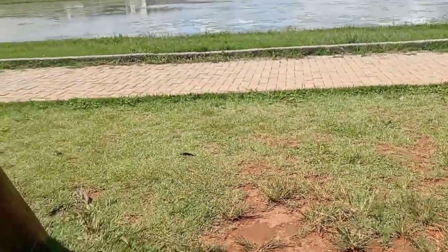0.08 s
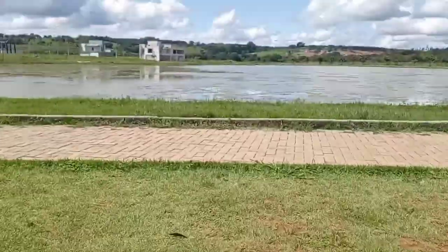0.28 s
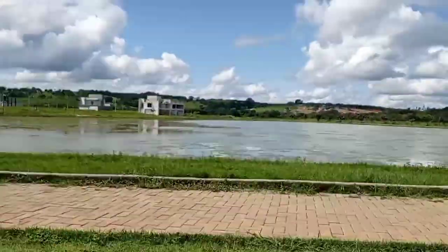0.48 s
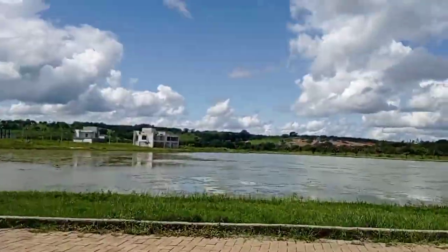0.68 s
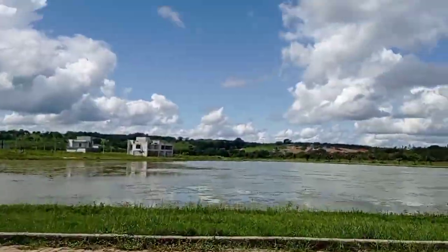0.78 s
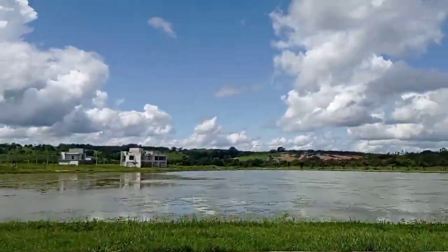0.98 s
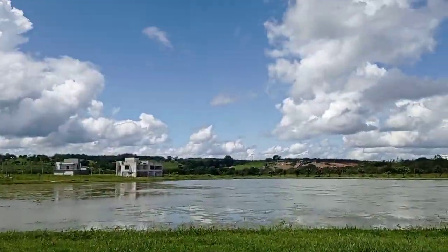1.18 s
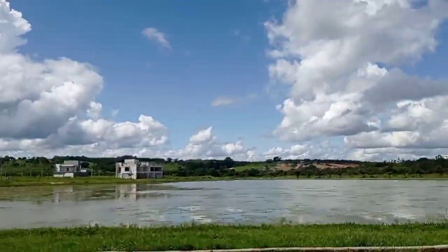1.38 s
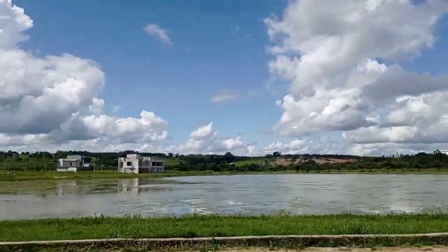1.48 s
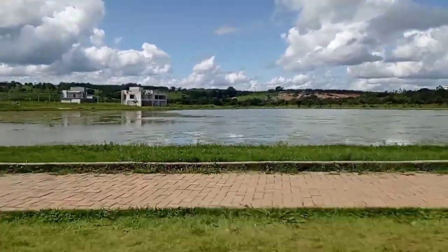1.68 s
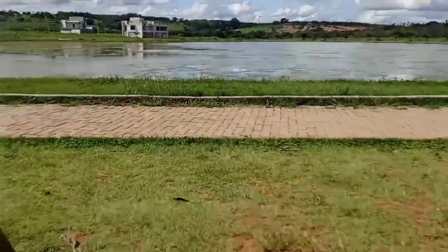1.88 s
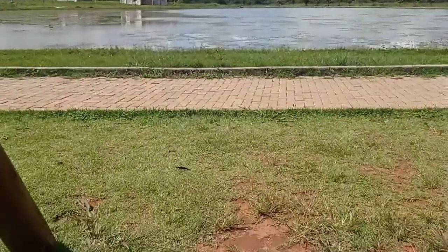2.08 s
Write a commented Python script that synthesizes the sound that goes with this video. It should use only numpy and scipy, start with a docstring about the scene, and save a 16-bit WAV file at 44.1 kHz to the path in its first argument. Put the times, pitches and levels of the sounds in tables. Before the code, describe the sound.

A rusty playground swing squeaks close by in an open park: a long squeal with a rough rattling start, a quiet gap, then a stuttering double shriek sinking to a low moan and faint clicks, over soft wind.

```python
"""An open park with a playground swing, heard from its seat: the dry steel hanger sticks and slips on two strokes.
Going out it sings one long squeal, with a rough groan and rattle at the start. Coming back it stutters, shrieks on
two pitches at once, sinks to a low moan and stops with faint clicks. The squeals are trembling sine waves with
overtones, the rattle and clicks are ringing steel, and the rubbing and ticks are shaped noise.
Soft wind, dull bumps of the seat and a far bird lie behind."""
import sys
import numpy as np
from scipy import signal
from scipy.fft import rfft, irfft, next_fast_len
from scipy.io import wavfile
from scipy.ndimage import map_coordinates

SR = 44100
rng = np.random.default_rng(int(sys.argv[2]) if len(sys.argv) > 2 else 0)


def log_audio(samples):
    """Write samples as a 16-bit WAV file to the path given in sys.argv[1]."""
    # one column per channel
    frames = np.atleast_2d(samples).T
    # limit to full scale, then quantise
    limited = np.clip(frames, -1, 1)
    pcm = np.round(limited * 32767).astype(np.int16)
    wavfile.write(sys.argv[1], SR, pcm)


N = 94815
T = np.arange(N) / SR  # time of every sample, in seconds

# Tone colour of steel rubbing on steel, relative: pitch_hz, level_db (per Hz)
RUBBING_COLOUR = [(300, -13.5), (600, -18.5), (1000, 5.5), (1450, -7), (2000, -6), (2900, -8.5),
                  (3400, -15), (4800, -14), (6100, -10), (7000, -20), (8000, -31)]


def amp(db):
    """Turn decibels into gain."""
    return 10 ** (np.asarray(db) / 20)


def unit(x):
    """Scale a sound to an rms of 1."""
    return x / np.sqrt(np.mean(x ** 2) + 1e-20)


def curve(rows, axis=1):
    """Join one column of a table by straight lines in time."""
    rows = np.array(rows)
    return np.interp(T, rows[:, 0], rows[:, axis])


def gate(start, end, edge_s):
    """Open between two times, with soft edges."""
    opening = 1 + np.tanh((T - start) / edge_s)
    closing = 1 + np.tanh((end - T) / edge_s)
    return opening * closing / 4


def envelope(rows, axis=1):
    """Turn a column of decibels into gain that fades to silence outside its rows."""
    return amp(curve(rows, axis)) * gate(rows[0][0], rows[-1][0], edge_s=0.0011)


def wobble(rate):
    """Draw a smooth random curve through a given number of random points a second."""
    points = rng.standard_normal(8192)
    return map_coordinates(points, [T * rate], mode="wrap")


def filtered(x, response):
    """Multiply the spectrum of x by a gain that depends on frequency."""
    size = next_fast_len(N + 8192)
    gain = response(np.fft.rfftfreq(size, 1 / SR))
    return irfft(rfft(x, size) * gain, size)[:N]


def noise(colour):
    """Make noise of rms 1 whose spectrum follows a table of pitch_hz, level_db."""
    colour_hz, colour_db = np.transpose(colour)

    def response(hz):
        return amp(np.interp(np.log(hz + 1), np.log(colour_hz), colour_db))

    return unit(filtered(rng.standard_normal(N), response))


def slip_phase(hz, jitter, rate):
    """Follow the phase of a stick-slip oscillation whose pitch trembles by the fraction jitter."""
    trembling_hz = hz * (1 + jitter * wobble(rate))
    return 2 * np.pi * np.cumsum(trembling_hz) / SR


def partials(phase, table, flutter_db, rate):
    """Add up multiples of one oscillation, each fluttering in level."""
    total = np.zeros(N)
    for multiple, db in table:
        level = amp(db + flutter_db * wobble(rate))
        total += level * np.sin(multiple * phase + rng.uniform(0, 2 * np.pi))
    return total


def glides(table, jitter, flutter_db, edge_s):
    """Play short tones that glide from a first pitch to a last pitch."""
    total = np.zeros(N)
    for start, length, first_hz, last_hz, db in table:
        end = start + length
        level = amp(db + flutter_db * wobble(160)) * gate(start, end, edge_s)
        hz = np.interp(T, [start, end], [first_hz, last_hz])
        total += level * np.sin(slip_phase(hz, jitter, rate=400))
    return total


def outward_squeal():
    """Stick-slip gives a long clean note that falters now and then; it trembles more while the load is high."""
    # Pitch of the squeal: time_s, pitch_hz
    pitch = [(.2, 1240), (.235, 1250), (.34, 1252), (.375, 1230), (.43, 1228), (.49, 1235), (.54, 1243),
             (.6, 1245), (.65, 1246), (.73, 1255), (.81, 1245), (.88, 1256), (.95, 1250)]
    # Loudness of its lowest tone before the falters: time_s, level_db
    tone_level = [(.203, -45), (.212, -23), (.228, -20.5), (.255, -20), (.275, -28), (.31, -18.5),
                  (.331, -36.5), (.35, -20.5), (.372, -15), (.405, -23.5), (.44, -25.5), (.52, -23.5),
                  (.56, -28), (.59, -22.5), (.695, -33.5), (.765, -31), (.785, -37), (.815, -36.5),
                  (.885, -39.5), (.94, -38.5), (.952, -80)]
    # Loudness of its overtones before the falters: time_s, level_db
    edge_level = [(.205, -63), (.222, -49.5), (.345, -53.5), (.38, -41), (.47, -38.5), (.52, -38.5),
                  (.59, -40), (.68, -43), (.75, -41), (.81, -54), (.835, -59), (.885, -50), (.915, -81),
                  (.95, -56)]
    # Overtones of the squeal, relative: multiple, level_db
    overtones = [(2, 1.5), (3, -8.5), (4, -5.5), (5, 3.5), (6, -14)]
    # Brief dips in level: time_s, width_s (to either side), depth_db
    falters = [(.427, 0.0046, 10), (0.455, 0.0047, 11), (0.478, 0.0033, 11), (.498, 0.0037, 16.5),
               (0.529, 0.0054, 8), (.832, 0.0065, 25), (0.867, 0.0045, 20), (.921, .008, 32)]

    strain = np.interp(T, [.5, .56], [1, 0])  # high load, then none
    phase = slip_phase(curve(pitch), .0014 + 0.0021 * strain, rate=220)
    dip_db = sum(depth * np.exp(-((T - time) / width) ** 2) for time, width, depth in falters)
    edge = partials(phase, overtones, flutter_db=2.5 + 1.5 * strain, rate=57)
    return amp(-dip_db) * (envelope(tone_level) * np.sin(phase) + envelope(edge_level) * edge)


def groan():
    """A second, rougher stick-slip note breaks in under the squeal."""
    # Course of the groan: time_s, pitch_hz, level_db
    course = [(.2388, 815, -18), (.241, 835, -13), (.247, 855, -14), (.251, 876, -20), (.26, 877, -18),
              (.29, 877, -18), (.315, 877, -20), (.348, 880, -23), (.362, 890, -45)]
    # Tones that make up the groan, relative: multiple, level_db
    tones = [(1, 2.5), (2, -15.5), (3, -22), (4, -39), (2.43, -19.5)]

    phase = slip_phase(curve(course), jitter=0.0097, rate=370)
    return envelope(course, axis=2) * partials(phase, tones, flutter_db=2.3, rate=220)


def stutter():
    """The hanger catches: each note swells, sags in pitch and is choked; overtones and grit come with strength."""
    # Notes: peak_s, pitch_hz (at the peak), level_db, swell_s, choke_s
    notes = [(1.422, 1010, -21.5, 0.0033, 0.0084), (1.4755, 1085, -7.5, 0.0039, 0.0053),
             (1.506, 1095, -12.5, 0.011, .004), (1.525, 1065, -13, .003, 0.0036),
             (1.554, 1090, -13.5, 0.011, 0.0021), (1.579, 1075, -16.5, 0.0076, .004)]
    # Overtones of each note, relative: multiple, level_db
    overtones = [(2, -20), (3, -34), (4, -37), (5, -28.5), (6, -29.5), (7, -46)]
    # Tone colour of the grit, relative: pitch_hz, level_db (per Hz)
    grit_colour = [(500, -19), (1500, -20), (2200, -0.5), (2800, -15), (4800, -15.5), (5600, -1),
                   (6500, 12), (7100, -21), (8000, -21.5)]
    sag_hz, sag_s = 45, 0.011  # the pitch starts this far above its middle and ends as far below
    grit_db = -24

    out = np.zeros(N)
    grit = amp(grit_db) * noise(grit_colour)
    for peak, hz, db, swell_s, choke_s in notes:
        since_peak = T - peak
        rise = np.exp(1 - np.hypot(1, 1.66 * since_peak / swell_s))
        fall = np.exp(-(since_peak / choke_s) ** 2)
        swell = np.where(T < peak, rise, fall)
        sagging_hz = hz - sag_hz * np.tanh(since_peak / sag_s)
        phase = slip_phase(sagging_hz, jitter=.014, rate=710)
        edge = partials(phase, overtones, flutter_db=4.5, rate=400) + grit
        out += amp(db) * swell * (np.sin(phase) + swell ** .5 * edge)
    return out


def shriek():
    """On the way back the stick-slip squeal climbs near its old pitch while a rough lower voice sounds with it."""
    # Return squeal: time_s, pitch_hz, lowest_tone_db, overtones_db
    squeal = [(1.43, 1118, -46, -68), (1.455, 1144, -30.5, -51), (1.49, 1140, -29, -36),
              (1.545, 1150, -39.5, -49.5), (1.57, 1185, -25.5, -27.5), (1.595, 1209, -28, -36.5),
              (1.632, 1223, -20.5, -24.5), (1.655, 1213, -24.5, -25.5), (1.682, 1247, -53, -27),
              (1.705, 1239, -44.5, -36), (1.74, 1240, -49.5, -60)]
    # Overtones of the return squeal, relative: multiple, level_db
    overtones = [(2, 1), (3, -20.5), (4, -29.5), (5, -19)]
    # Lower voice: time_s, pitch_hz, level_db (relative)
    lower_voice = [(1.555, 1000, -31.5), (1.572, 970.5, -31), (1.59, 958.3, -26.5), (1.602, 943, -43),
                   (1.612, 967, -21), (1.636, 938, -29), (1.656, 986, -42), (1.668, 981, -36.5),
                   (1.677, 983, -20.5), (1.692, 938, -24), (1.706, 925, -35), (1.724, 952, -28),
                   (1.742, 920, -47)]
    # Tones that make up the lower voice, relative: multiple, level_db
    lower_tones = [(1, 2), (2, -11), (3, -14.5), (4, -29.5), (5, -21), (6, -25)]

    phase = slip_phase(curve(squeal), jitter=0.0078, rate=300)
    edge = partials(phase, overtones, flutter_db=2.5, rate=150)
    upper = envelope(squeal, axis=2) * np.sin(phase) + envelope(squeal, axis=3) * edge
    lower_phase = slip_phase(curve(lower_voice), jitter=0.01, rate=350)
    lower = partials(lower_phase, lower_tones, flutter_db=1.5, rate=180)
    return upper + amp(-.5) * envelope(lower_voice, axis=2) * lower


def whistles():
    """A high mode of the hanger flares in bursts, gritty or cleaner; a lower voice gives it side tones."""
    # Bursts: start_s, length_s, level_db (relative), roughness (0 to 1)
    bursts = [(1.587, .006, -36.5, .9), (1.61, 0.0062, -25.5, 0.6), (1.627, .011, -31, .9),
              (1.672, 0.0053, -26, 0.8), (1.679, 0.044, -25.5, 0.2), (1.753, 0.024, -49.5, .5)]
    # Side tones, relative: multiple (of the lower voice, added to the whistle), level_db
    side_tones = [(-2, -20.5), (-1, -23), (0, 3.5), (1, -5)]
    whistle_hz, lower_hz = 6193, 938
    scatter, grit_db = .018, -4  # at full roughness: pitch trembling as a fraction, level of the grit

    out = np.zeros(N)
    lower = slip_phase(lower_hz, jitter=.008, rate=380)
    grit = amp(grit_db) * noise(RUBBING_COLOUR)
    for start, length, db, rough in bursts:
        phase = slip_phase(whistle_hz, scatter * rough, rate=800)
        tone = sum(amp(tone_db) * np.sin(phase + k * lower) for k, tone_db in side_tones)
        level = amp(db + 1.2 * wobble(250)) * gate(start, start + length, edge_s=0.0016)
        out += level * (tone + rough * grit)
    return out


def moan():
    """The slowing hanger ends on a low stick-slip note that loses its overtones as it fades."""
    # Course of the moan: time_s, pitch_hz, level_db
    course = [(1.846, 790, -55), (1.856, 738, -38), (1.862, 728, -29), (1.888, 733, -34), (1.903, 750, -33),
              (1.919, 762, -42), (1.932, 738, -37), (1.96, 742, -42), (1.985, 735, -47), (2.003, 705, -60)]
    # Overtones of the moan, relative: multiple, level_db
    overtones = [(2, -3), (3, -10), (4, -20.5), (5, -19.5), (6, -21.5), (7, -25), (8, -24)]
    dulling = 0.2  # how strongly the overtones shrink with the level

    phase = slip_phase(curve(course), jitter=0.0085, rate=230)
    level = envelope(course, axis=2)
    brightness = (level / level.max()) ** dulling
    edge = brightness * partials(phase, overtones, flutter_db=2.0, rate=76)
    return level * (np.sin(phase) + edge)


def side_squeaks():
    """Weak trembling tones glide up, down or level beside the main squeals."""
    # Squeaks: start_s, length_s, first_hz, last_hz, level_db
    squeaks = [(0.307, .05, 510, 514, -41), (0.24, .025, 2200, 2000, -45.5), (.365, 0.14, 2100, 1850, -49),
               (1.73, 0.062, 1590, 1545, -38), (1.744, 0.049, 1057, 1200, -34),
               (1.747, 0.068, 2560, 2640, -46), (1.753, 0.067, 1360, 1360, -36),
               (1.809, 0.041, 1195, 1140, -32)]
    return glides(squeaks, jitter=.015, flutter_db=2.0, edge_s=.005)


def link():
    """Every jolt or click rings the chain link anew as a set of fading sine waves."""
    # Jolts during the groan: time_s, level_db (relative)
    jolts = [(.2395, -11), (.2465, -12.5), (.258, -18), (.273, -15), (.281, -18.5), (.2912, -9),
             (0.3075, -16), (.318, -29.5), (.337, -24), (.35, -37.5)]
    # Later clicks of the link: time_s, level_db (relative)
    clicks = [(1.399, -35.5), (1.409, -26), (2.036, -32), (2.056, -39), (2.063, -40), (2.074, -40)]
    # Tones the link rings with: pitch_hz, level_db (before random variation), t60_s (time to fade by 60 dB)
    modes = [(688, -13, 0.045), (815, -10.5, 0.084), (884, -12, 0.09), (1015, -7.5, 0.036),
             (1155, -3, 0.04), (1784, -9, 0.022), (2138, -21, .08), (2350, -17, 0.077), (2640, -24, 0.045),
             (3010, -26, .05), (5400, -26.5, .02), (5850, -21, 0.028), (6300, -27, .02)]

    out = np.zeros(N + SR)
    t = np.arange(SR // 8) / SR
    attack = 1 - np.exp(-t / .0006)
    for start, db in jolts + clicks:
        ring = np.zeros(len(t))
        for hz, mode_db, t60 in modes:
            fading = amp(mode_db + rng.normal(0, 2) - 60 * t / t60)
            ring += fading * np.sin(2 * np.pi * (hz * t + rng.random()))
        out[round(start * SR):][:len(t)] += amp(db) * ring * attack
    return out[:N]


def ticks():
    """Light dry contacts along the chain: bursts of noise that start at once and die away."""
    # Contacts: time_s, level_db (relative)
    contacts = [(.188, -35), (1.147, -34), (2.037, -41), (2.136, -46)]
    # Tone colour of the contacts, relative: pitch_hz, level_db
    contact_colour = [(500, 2), (1500, -18), (2300, 5), (3200, -8.5), (4500, -23), (6000, -23), (8000, -31)]
    decay_s = 0.0044

    level = sum(amp(db) * (T > time) * np.exp(-abs(T - time) / decay_s) for time, db in contacts)
    return noise(contact_colour) * level


def rubbing():
    """Steel rubbing on steel: gritty friction noise that swells and fades with the strokes."""
    # Loudness of the rubbing: time_s, level_db
    loudness = [(.23, -87), (.242, -30.5), (.31, -32.5), (.35, -32.5), (.42, -41.5), (.55, -62.5),
                (1.38, -63.5), (1.41, -40.5), (1.45, -60.5), (1.56, -56), (1.59, -29.5), (1.635, -38),
                (1.655, -49), (1.677, -36.5), (1.73, -48), (1.77, -44.5), (1.87, -43), (1.95, -52.5),
                (2.02, -60)]
    grit = unit(noise(RUBBING_COLOUR) * amp(2.1 * wobble(350)))
    return envelope(loudness) * grit


def seat_bumps():
    """Dull bumps of the seat: low noise in short, rounded swells."""
    # Bumps: time_s, width_s (to either side), level_db
    bumps = [(1.603, .008, -36), (1.62, .025, -46), (1.846, .018, -43)]
    # Tone colour of the bumps, relative: pitch_hz, level_db (per Hz)
    bump_colour = [(30, -21), (90, -6.5), (150, 0.5), (280, -11), (600, -32), (2000, -55)]
    level = sum(amp(db) * np.exp(-((T - time) / width) ** 2) for time, width, db in bumps)
    return noise(bump_colour) * level


def far_bird():
    """A far bird gives short chirps, each a trembling tone that glides in pitch."""
    # Chirps: start_s, length_s, first_hz, last_hz, level_db
    chirps = [(1.322, .024, 4700, 4600, -55), (1.392, .014, 3850, 4150, -49),
              (2.088, .022, 4800, 4540, -52)]
    return glides(chirps, jitter=0.011, flutter_db=4.0, edge_s=0.0028)


def wind():
    """Soft wind: shaped noise whose strength drifts slowly, with small random gusts."""
    # Strength of the wind, relative: time_s, level_db
    strength = [(0, 2), (.35, -2), (.65, -1), (.95, 1.5), (1.35, 1), (1.75, -4), (2.15, -1.5)]
    # Tone colour of the wind, relative: pitch_hz, level_db (per Hz)
    wind_colour = [(20, -55.5), (35, -32.5), (50, -14.5), (65, -8.5), (120, -1), (160, -5), (250, -10),
                   (400, -15.5), (475, -10.5), (600, -14.5), (830, -17.5), (1300, -21), (1900, -16),
                   (3050, -18.5), (3700, -24), (6400, -27), (8000, -43.5)]
    base_db, gust_db = -46.5, .4
    return amp(base_db + curve(strength) + gust_db * wobble(12)) * noise(wind_colour)


def open_air(x):
    """Add a faint short scatter behind the direct sound: fading noise that starts after 4 ms."""
    air_t60_s, air_db = 0.14, -22.5
    t = np.arange(SR // 3) / SR
    tail = rng.standard_normal(len(t)) * amp(-60 * t / air_t60_s) * (t > .004)
    tail = tail / np.linalg.norm(tail)
    return x + amp(air_db) * signal.fftconvolve(x, tail)[:N]


def scene():
    """Play both strokes of the swing in the park."""
    outward = outward_squeal() + groan()
    back = stutter() + shriek() + whistles() + moan()
    contacts = link() + ticks() + rubbing()
    swing = open_air(outward + back + side_squeaks() + contacts)
    park = seat_bumps() + far_bird() + wind()
    return (swing + park)[None]


def record(dry):
    """The microphone rolls off in the treble and keeps nothing above its band limit."""
    rolloff_hz, top_hz = 7650, 8250

    def response(hz):
        return (hz < top_hz) / np.sqrt(1 + (hz / rolloff_hz) ** 50)

    return filtered(dry[0], response)[None]


dry = scene()
out = record(dry)
log_audio(out)
```